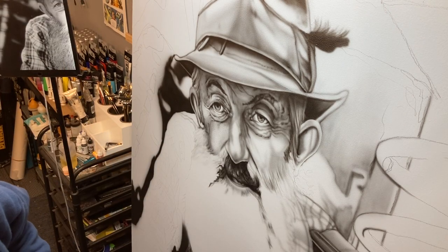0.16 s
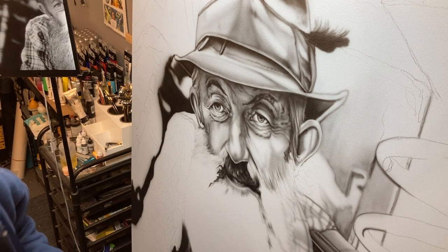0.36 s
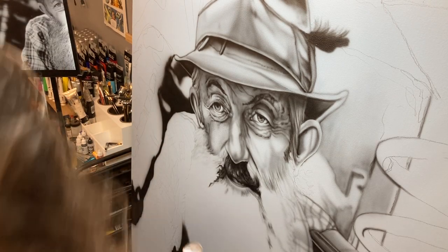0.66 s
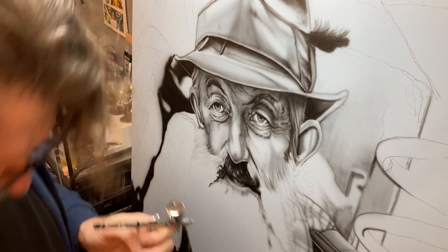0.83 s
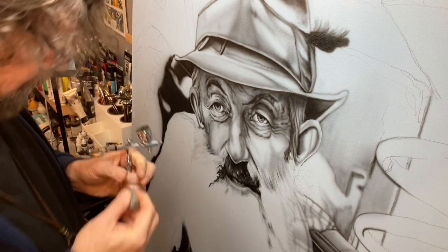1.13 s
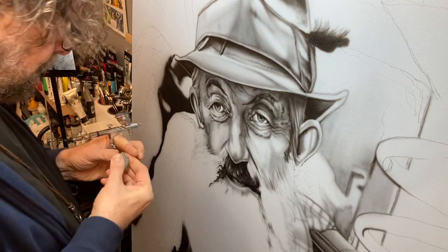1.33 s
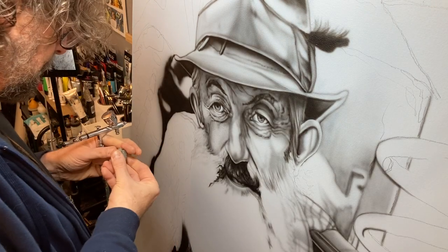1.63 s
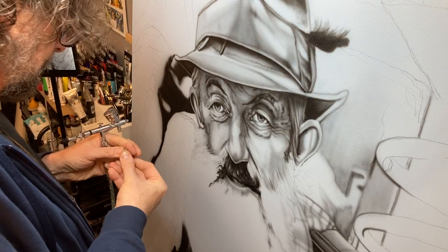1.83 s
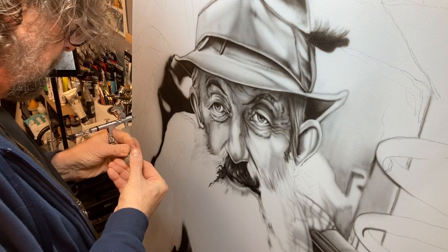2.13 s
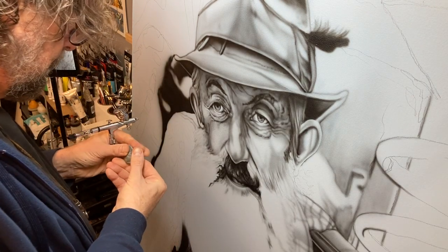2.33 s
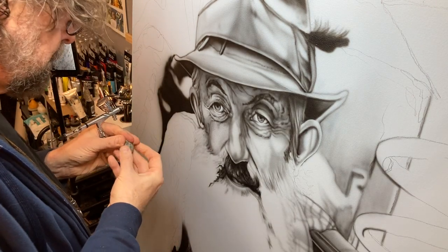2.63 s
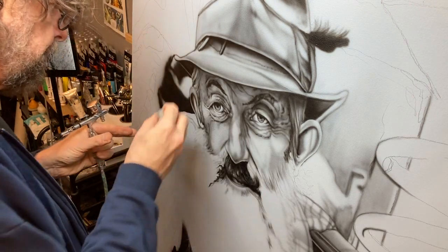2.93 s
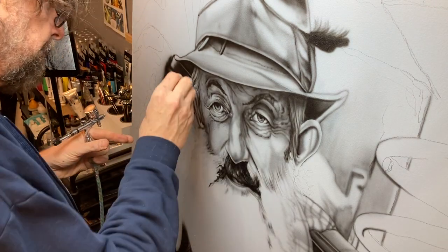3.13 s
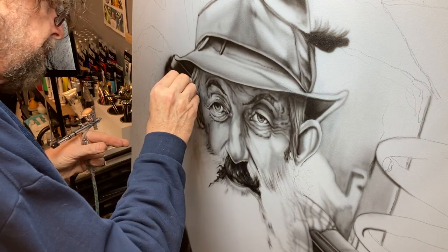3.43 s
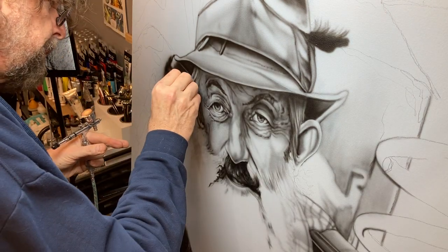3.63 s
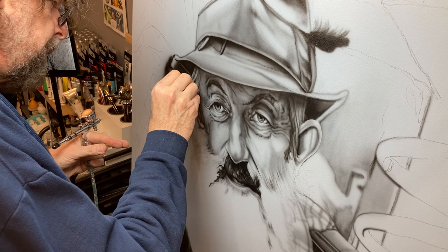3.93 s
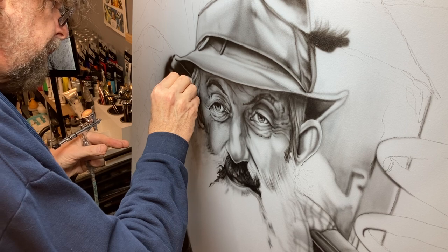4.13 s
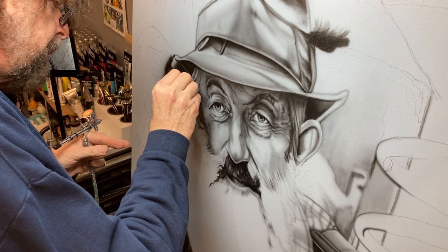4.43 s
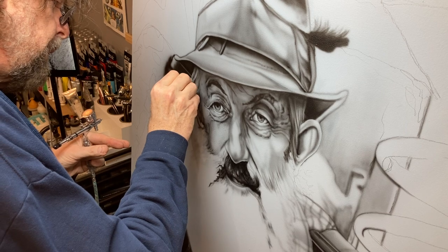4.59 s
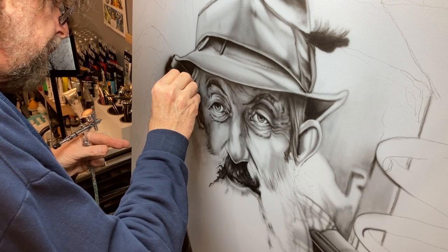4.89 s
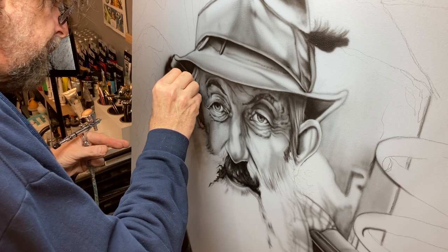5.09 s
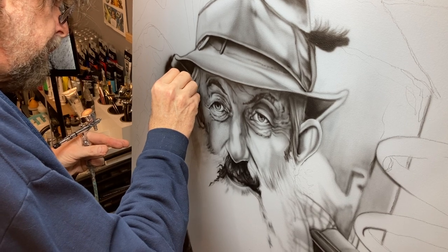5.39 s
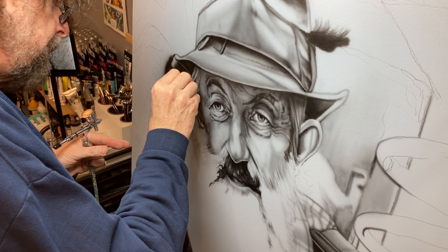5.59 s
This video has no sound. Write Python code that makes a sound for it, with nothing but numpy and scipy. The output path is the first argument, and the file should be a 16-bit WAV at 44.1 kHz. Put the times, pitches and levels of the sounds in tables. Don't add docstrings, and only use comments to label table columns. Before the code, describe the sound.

A small piston air compressor runs steadily indoors, a low buzzing motor drone with rapid metallic valve clatter, hiss and occasional rattles.

```python
import sys
import numpy as np
from scipy import signal
from scipy.fft import rfft, irfft, next_fast_len
from scipy.io import wavfile
from scipy.ndimage import uniform_filter1d

SR = 44100
rng = np.random.default_rng(int(sys.argv[2]) if len(sys.argv) > 2 else 0)


def invert_db(level):
    return 10 ** (np.asarray(level, dtype=float) / 20)


def to_wav(sig):
    pcm = np.clip(np.atleast_2d(sig), -1, 1) * 32767
    pcm = np.round(pcm).astype(np.int16)
    wavfile.write(sys.argv[1], SR, pcm.T)


N = 253575
LEAD = SR // 2
MIDDLE_S = N / SR / 2
TURN_HZ, MAINS_PULL_HZ = 28.69, 119.95


def turns_at(t):
    start_s, speedup_hz_per_s = .0017, .0024
    return TURN_HZ * (t - start_s) + speedup_hz_per_s / 2 * (t - MIDDLE_S) ** 2


PATHS = [
    (2, 2, 1.13, .84, 0),
    (3, 2, -2.17, .07, -.5),
    (6, 2, 3.05, 1.89, -.135),
    (15, 2, 2.7, -1.3, 0),
    (17, 1, .1, -.42, 0),
    (27, 1, 2.2, -2.95, -.007),
    (40, 1, .21, -.11, -.545),
]


def path_phase(k, chance):
    fitting_paths = [row for row in PATHS if row[0] <= k and (k - row[0]) % row[1] == 0]
    first, _, start, delay, smear = max(fitting_paths)
    lag = .8 * left_lag(k * TURN_HZ) + .006 * k * chance
    return start + delay * (k - first) + smear * (k - first) ** 2 - np.array([lag, 0])


# (multiple of the turn, left level/dB, right level/dB)
DRONE = [(2, -32, -31), (3, -46, -45), (4, -41, -40), (5, -43, -40), (6, -32, -29), (7, -32, -30),
         (8, -30, -30), (9, -39, -41), (10, -47, -45), (11, -50, -55), (12, -51, -44), (13, -45, -46),
         (14, -44, -46), (15, -56, -54), (16, -61, -55)]
# (multiple of the turn, left level/dB, right level/dB)
HEAD = [(17, -53, -48), (21, -57, -56), (23, -57, -47), (24, -60, -55), (27, -52, -49), (28, -61, -52),
        (29, -53, -46), (31, -50, -44), (33, -58, -56), (34, -53, -43), (40, -75, -57), (41, -57, -59),
        (42, -58, -58), (43, -57, -59), (49, -70, -58), (50, -59, -69), (51, -62, -52), (52, -57, -70),
        (54, -56, -57), (58, -58, -55), (60, -57, -65), (63, -61, -64)]
FILLING = {4: -1.3, 11: 1.3, 12: 1.2, 17: .8}


def drone(t):
    weak_from, weak_to = 18, 63
    weak_db, weak_db_per_octave, weak_spread_db = -62.5, -6.5, 8
    load_db_per_s, waver_db_per_multiple = .17, .0305
    shade_db, shade_ends_s, shade_fade_s = -.5, .46, .039
    shade = shade_db / (1 + np.exp((t - shade_ends_s) / shade_fade_s))
    strong = {k: (left_db, right_db) for k, left_db, right_db in DRONE + HEAD}
    turn = np.exp(2j * np.pi * turns_at(t))
    wave = turn
    out = np.zeros((2, len(t)))
    for k, chance in enumerate(rng.standard_normal((weak_to - 1, 4)), start=2):
        wave = wave * turn
        if k in strong:
            phase = path_phase(k, chance[0])
            ports_db = np.array(strong[k])
        else:
            phase = 2 * np.pi * chance[:2]
            ports_db = weak_db + weak_db_per_octave * np.log2(k / weak_from) + weak_spread_db * chance[2:]
        db = (load_db_per_s + FILLING.get(k, 0)) * (t - MIDDLE_S)
        db = db + waver_db_per_multiple * k * walk(2.5, size=len(t))
        db = db + (k > 10) * shade
        line = wave * np.repeat(invert_db(db[::64]), 64)[:len(t)]
        ports = invert_db(ports_db) * np.exp(1j * phase)
        out += (ports[:, None] * line).real
    return np.sqrt(2) * out


PLACES = [.03, .22, .26, .36, .53, .73, .77, .8, .8, .81, .85, .88, .97, .8]
# (ring f/Hz, width/Hz, tick level/dB, air puff level/dB, puff decay/s)
CLACKS = [(3380, 800, -60, -59.5, 0.0042), (3250, 980, -59.5, -53.5, 0.0035),
          (7680, 1000, -61.5, -65, 0.0013), (3360, 690, -60.5, -79, 0.0018), (2520, 290, -57, -85, .002),
          (2320, 1330, -54.5, -54.5, 0.0019), (5300, 1400, -57, -67, .001),
          (4980, 1360, -53.5, -56, 0.0038), (7580, 740, -56, -71, 0.0015), (3110, 600, -57.5, -58, 0.0025),
          (5210, 840, -48, -60, 0.0012), (7800, 460, -57, -60.5, 0.0047), (4770, 1450, -55, -52, 0.0045),
          (11000, 12000, -78, -60, 0.01)]


def valves(t):
    out, turns = 0, turns_at(t)
    for place, (hz, width_hz, tick_db, puff_db, decay) in zip(PLACES, CLACKS):
        blows = rng.standard_normal((int(turns[-1] - turns[0]) + 3, 2))
        count = np.floor(turns - place + .1)
        size, late = blows[(count - count[0]).astype(int)].T
        since = (turns - place - count) / TURN_HZ - 10e-6 * late
        near = np.abs(since) < 16 / SR
        tick = np.zeros(len(t))
        tick[near] = np.sinc(.8 * SR * since[near]) * np.exp(-(SR * since[near] / 6) ** 2)
        puff = np.exp(-since / decay) * (since > 0) * rng.standard_normal(len(t))
        out = out + invert_db(tick_db) * ring(invert_db(.5 * size) * tick, hz, width_hz)
        out = out + invert_db(puff_db) * ring(invert_db(2.3 * size) * puff, hz, .48 * width_hz)
    return out


# (turns added, level/dB)
HUM = [(0, -52), (2, -50), (4, -84), (12, -57), (14, -59), (19, -65.5), (21, -97), (25, -80)]


def hum(t):
    out = 0
    for k, db in HUM:
        level = np.sqrt(2) * invert_db(db + 1.6 * walk(1.2, size=len(t)))
        out = out + level * np.sin(2 * np.pi * (MAINS_PULL_HZ + k * TURN_HZ) * t)
    return out


# (f/Hz, level/dB per Hz)
CHATTER = [(600, -64), (900, -92), (1800, -76), (3000, -86), (5000, -100), (11000, -91.5)]
# (t/s, f/Hz, level/dB, length/s)
SHAKES = [(0.217, 1980, -45, 0.016), (.61, 9100, -51, .03), (1.17, 11000, -57, .03),
          (1.34, 3550, -46, 0.011), (2.506, 1900, -49, 0.019), (2.654, 4400, -42, .014),
          (4.05, 2550, -46, .025), (4.2, 2580, -43, 0.017), (4.39, 1800, -45, 0.02),
          (4.94, 4040, -41.5, 0.017), (5.553, 2550, -44, 0.027), (.78, 3020, -51, 0.044),
          (2.11, 2200, -58, .025), (3.297, 2600, -43, 0.011)]


def rattle(t):
    beat_hz = MAINS_PULL_HZ - 4 * TURN_HZ
    beat = (.5 + .5 * np.cos(2 * np.pi * beat_hz * (t - .01))) ** 1.5
    grit = rng.standard_normal(len(t)) * invert_db(3 * np.minimum(rng.exponential(size=len(t)), 6))
    grit = grit / np.std(grit)
    out = colour(grit * beat * invert_db(3.3 * walk(3.97, size=len(t))), CHATTER)
    for s, hz, db, length in SHAKES:
        swell = np.exp(-.5 * ((t - s) / length) ** 2)
        out = out + invert_db(db) * swell * ring(grit, hz, hz / 4)
    return out


# (f/Hz, level/dB per Hz)
HISS = [(300, -68.5), (560, -84), (900, -71.5), (1300, -77.5), (1600, -76.5), (2200, -79), (3500, -81.5),
        (5200, -83.5), (6500, -86), (7800, -86), (9000, -90), (11000, -89), (13000, -100.5), (16000, -92.5)]


def hiss(t):
    return colour(rng.standard_normal(len(t)) * invert_db(.73 * walk(7.3, size=len(t))), HISS)


# (f/Hz, lag/half cycles)
LEFT_LAG = [(0, 0), (2100, 1), (7000, 4), (22050, 10.7)]


def left_lag(hz):
    return np.pi * np.interp(hz, *np.transpose(LEFT_LAG))


def heard(x):
    t60_s, echo_db, dull_hz = .26, 0, 5200
    age = np.arange(LEAD) / SR
    fade = np.exp(-np.log(1000) * age / t60_s)
    tails = rng.standard_normal((2, LEAD)) * fade * (age > .003)
    tails = invert_db(echo_db) * tails / np.sqrt(np.sum(tails ** 2, axis=1, keepdims=True))
    f = np.fft.rfftfreq(len(x), 1 / SR)
    straight = np.array([np.exp(-1j * left_lag(f)), np.ones(len(f))])
    dull = 1 / np.sqrt(1 + (f / dull_hz) ** 2)
    both = straight + dull * rfft(tails, len(x))
    even_out = np.sqrt(1 + (invert_db(echo_db) * dull) ** 2)
    return irfft(rfft(x) * both / even_out, len(x))


# (f/Hz, level/dB per Hz)
SCATTERED = [(300, -128), (600, -78), (1200, -85.5), (2200, -93.5), (4000, -80.5), (7000, -97),
             (12000, -100), (16000, -106)]


def scattered_hiss(t):
    return colour(rng.standard_normal((2, len(t))), SCATTERED)


# (f/Hz, level/dB per Hz)
RUMBLE = [(25, -104), (48, -57), (62, -70.5), (78, -54.5), (98, -76), (118, -54), (140, -70), (160, -57.5),
          (210, -69.5), (300, -68.5), (450, -100.5)]


def rumble(t):
    return colour(rng.standard_normal((2, len(t))), RUMBLE)


def colour(x, points):
    hz, db = np.transpose(points)
    log_f = np.log(np.maximum(np.fft.rfftfreq(x.shape[-1], 1 / SR), 1))
    gain = invert_db(np.interp(log_f, np.log(hz), db, left=-130, right=-130)) * np.sqrt(SR / 2)
    return irfft(rfft(x) * gain, x.shape[-1])


def ring(x, hz, width_hz):
    b, a = signal.iirpeak(hz, hz / width_hz, SR)
    y = signal.lfilter(b, a, signal.lfilter(b, a, x))
    return y / np.std(y)


def walk(rate, size):
    k = int(SR / rate / 64)
    held = np.repeat(rng.standard_normal(size // (64 * k) + 1), k)
    coarse = uniform_filter1d(uniform_filter1d(held, k), k)
    return 1.3 * np.repeat(coarse, 64)[:size]


def scene():
    t = np.arange(-LEAD, next_fast_len(N + LEAD) - LEAD) / SR
    mid, side = rumble(t)
    bass = (mid + hum(t)) * invert_db([[-.8], [.6]])
    bass = bass + invert_db(-7) * side * np.array([[1], [-1]])
    machine = drone(t) + heard(valves(t) + rattle(t) + hiss(t))
    return (machine + bass + scattered_hiss(t))[:, LEAD:LEAD + N]


# (0 mid or 1 side, low edge f/Hz, may drop by/Hz, high edge f/Hz, may rise by/Hz)
HOLES = [(0, 8760, 345, 9620, 0), (0, 13100, 345, 14450, 170), (0, 15780, 345, 22050, 0),
         (1, 11030, 170, 11720, 520), (1, 15180, 345, 22050, 0)]
# (0 mid or 1 side, low f/Hz, high f/Hz, share lost 0-1)
THIN = [(0, 8270, 8800, .3), (0, 12400, 13100, .45), (0, 14400, 15800, .5), (1, 6850, 7250, .3),
        (1, 10300, 11050, .25), (1, 11700, 12400, .5), (1, 12400, 14400, .12), (1, 14400, 15200, .4)]


def skip_weak_treble(frames, f):
    for channel, low, drops, high, rises in HOLES:
        jump = uniform_filter1d(rng.standard_normal((2, frames.shape[2])), size=3) > .25
        above = f[:, None] > low - drops * jump[0]
        below = f[:, None] < high + rises * jump[1]
        frames[channel][above & below] = 0
    for channel, low, high, share in THIN:
        inside = (f > low) & (f < high)
        band = frames[channel][inside]
        near = uniform_filter1d(uniform_filter1d(np.abs(band), size=3, axis=0), size=3, axis=1)
        frames[channel][inside] = band * (near > np.quantile(near, np.clip(share, 0, 1)))
    return frames


def band_limit(x):
    return signal.sosfilt(signal.butter(12, 16990, fs=SR, output="sos"), x)


def record(dry):
    mid_side = np.array([dry[0] + dry[1], dry[0] - dry[1]]) / 2
    lead_in = 136
    f, _, frames = signal.stft(np.pad(mid_side, ((0, 0), (lead_in, 0))), SR, "cosine", 2048)
    frames = skip_weak_treble(frames, f)
    mid, side = signal.istft(frames, SR, "cosine", 2048)[1][:, lead_in:lead_in + N]
    return band_limit(np.array([mid + side, mid - side]))


dry = scene()
out = record(dry)
to_wav(out)
```